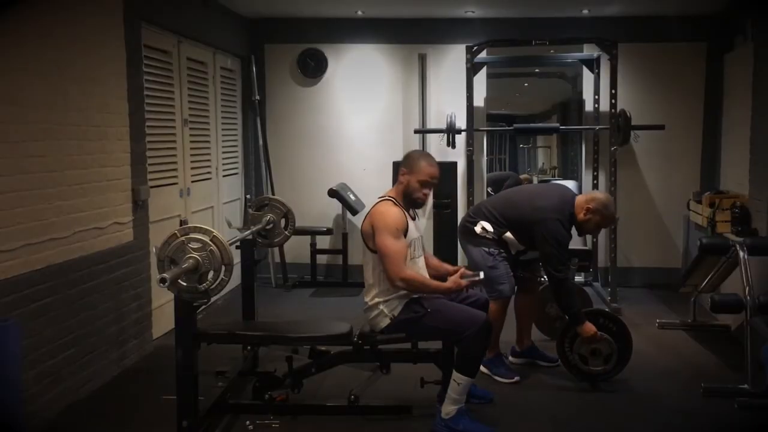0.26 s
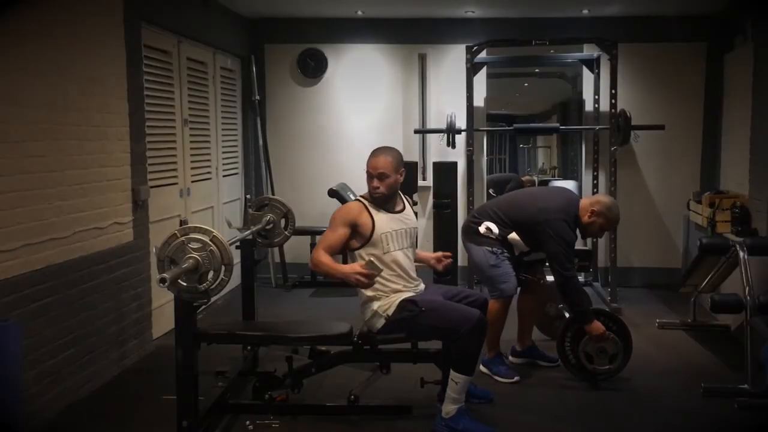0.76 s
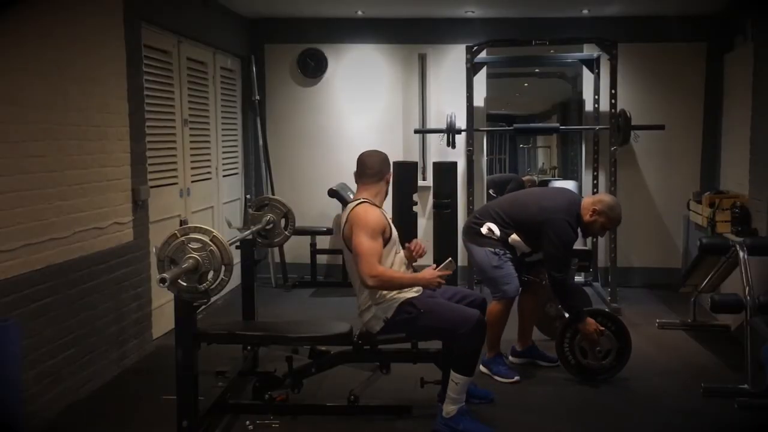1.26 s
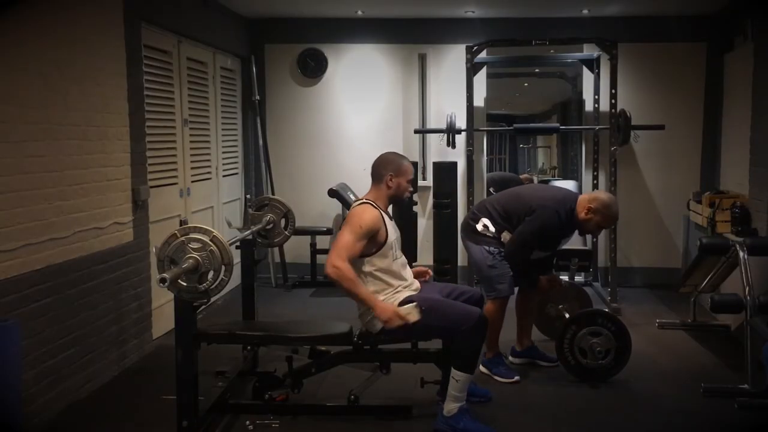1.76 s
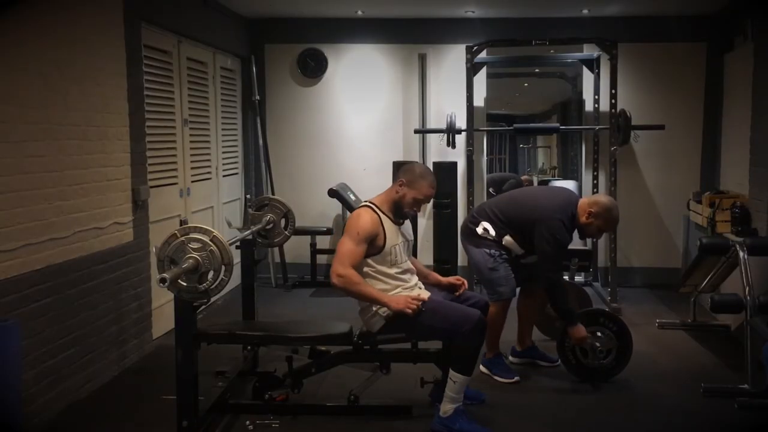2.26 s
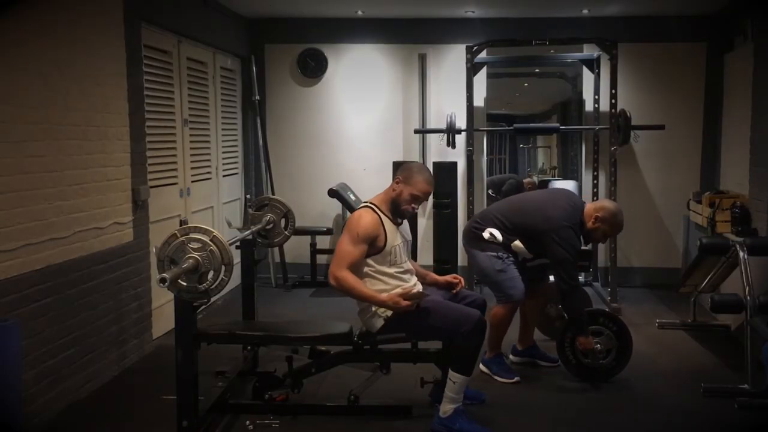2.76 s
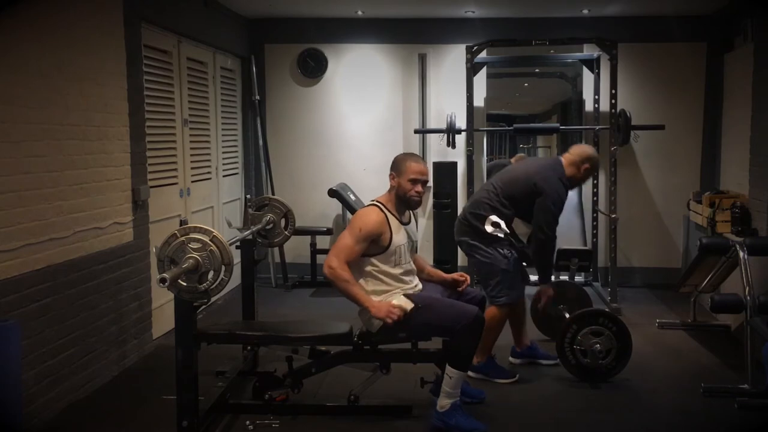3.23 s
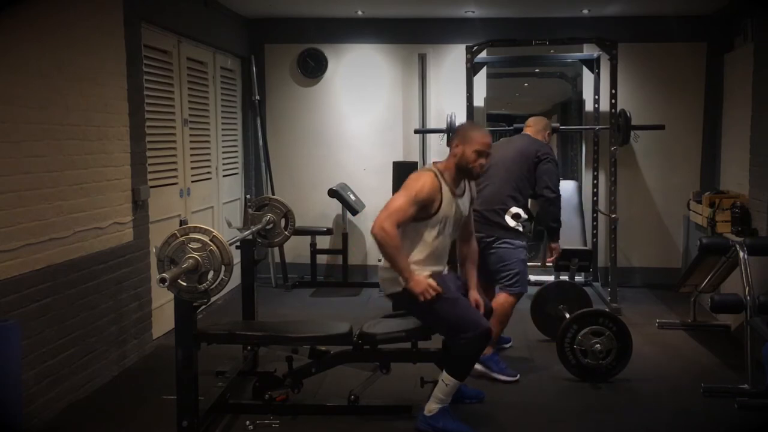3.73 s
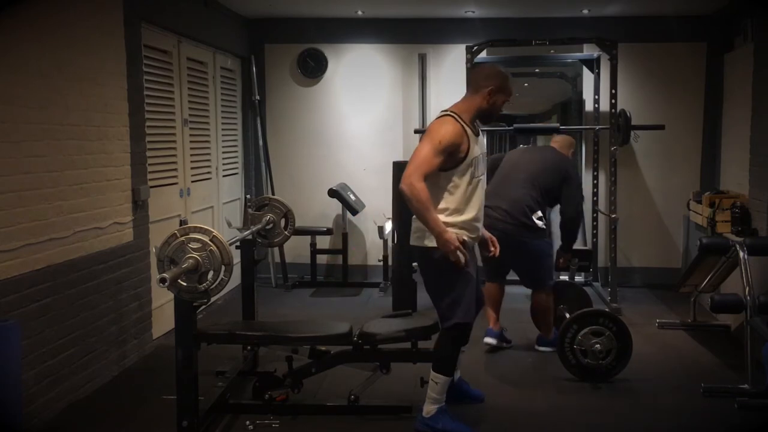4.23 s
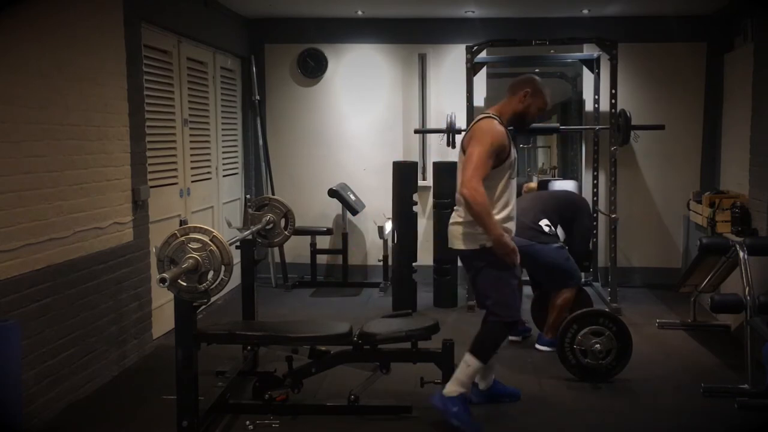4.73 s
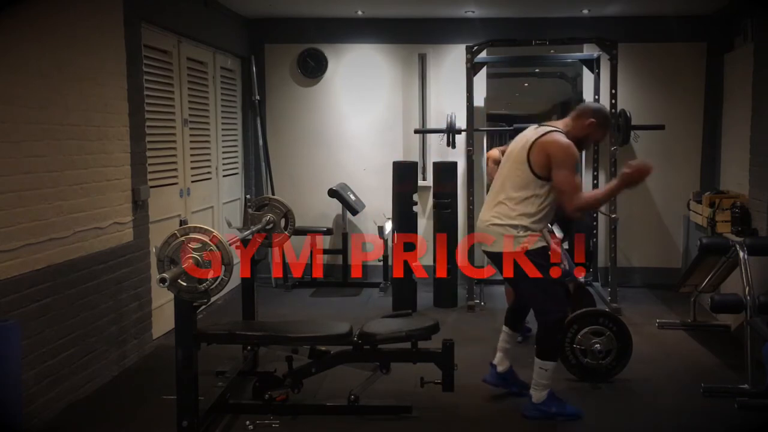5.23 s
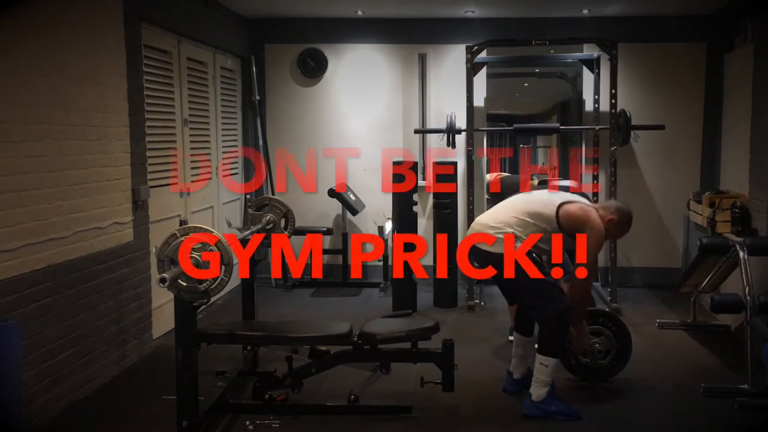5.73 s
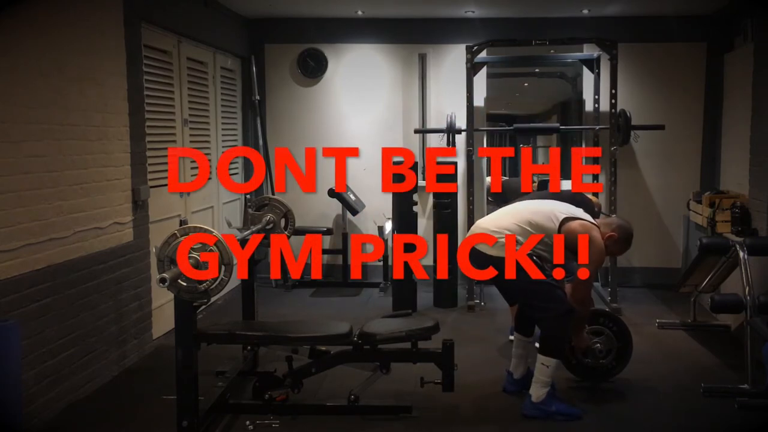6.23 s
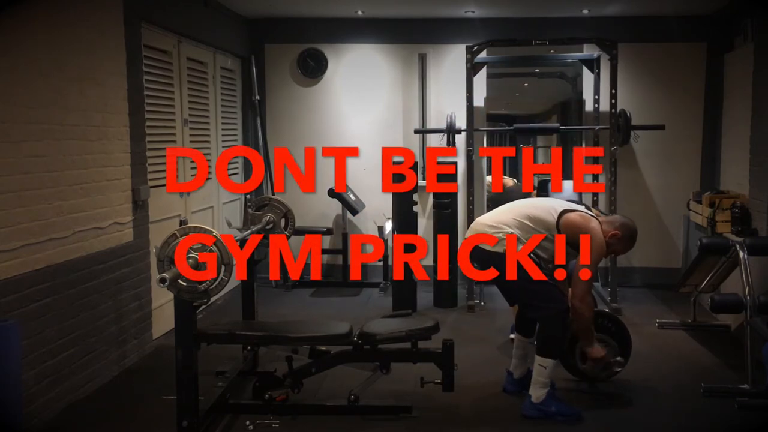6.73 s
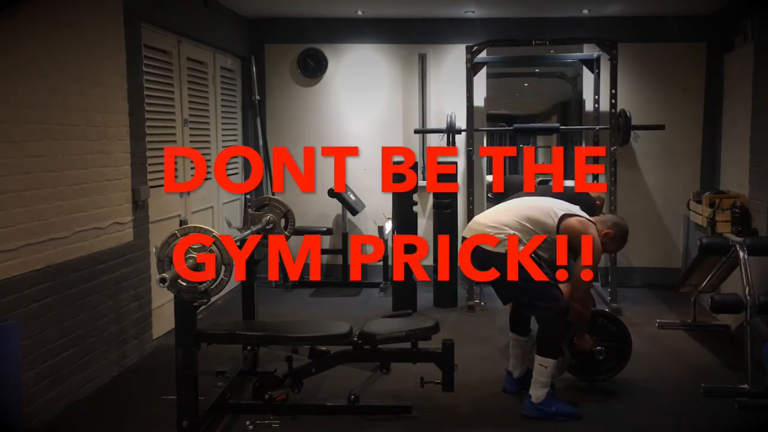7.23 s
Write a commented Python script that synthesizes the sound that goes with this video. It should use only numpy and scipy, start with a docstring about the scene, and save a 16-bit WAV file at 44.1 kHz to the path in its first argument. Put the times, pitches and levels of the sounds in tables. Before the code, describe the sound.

Two loud metallic clanks come in the first second and a half, the second deeper and singing on. A few light collar clicks tick before three seconds, then a quiet stretch of low air noise and soft movement. Duller clinks, a scrape and a rubber-mat thud lead to a hard closing slam, all with the short, dense echoes of a hard-walled room, heard by a single microphone.

```python
"""A small hard-walled gym, where iron weight plates are knocked, slid along a bar and racked.
Each contact is a crack of shaped noise with dense echoes, plus the ringing modes of its piece of iron.
The large plates sing on as pairs of close tones that beat; feet and rims thud on the rubber mat.
Cloth brushes as faint grainy hiss, over ventilation noise, fan tones and a low, unsteady hum near 49 Hz."""
import sys
import numpy as np
from scipy import signal
from scipy.fft import rfft, irfft, next_fast_len
from scipy.io import wavfile
from scipy.ndimage import map_coordinates

SR = 44100
rng = np.random.default_rng(int(sys.argv[2]) if len(sys.argv) > 2 else 0)


def wav_record(signal):
    """Record a signal, one row per channel, as 16-bit PCM in the file named by sys.argv[1]."""
    frames = np.transpose(np.atleast_2d(signal))
    bounded = np.clip(frames, -1, 1)
    # unit amplitude maps onto the largest positive 16-bit level
    quanta = np.round(bounded * 32767).astype(np.int16)
    wavfile.write(sys.argv[1], SR, quanta)


def volts(x):
    """Linear amplitude factor 10**(x/20) for a level x in dB, scalar or array-like."""
    e = np.asarray(x, float) / 20
    return 10 ** e


N = 329868  # samples in the scene
LONG = 5 * SR // 4  # samples in one contact, tone or thud

# Contacts of the iron; levels are nominal, the ring is relative to the clatter:
# (time [s], peak above 2 kHz [dB], rise [s], ring [dB], favoured frequency [Hz])
LIFT_CONTACTS = [(0.3051, -17, 0.00398, -11, 4300), (0.68, -48, 0.013, -4.5, 11000)]  # a plate knocks the stack as it is lifted
BAR_CONTACTS = [(.861, -44.5, .012, -8, 1970), (.951, -28.5, 0.022, -17.5, 6600),
                (1.307, -35.5, 0.0074, -17, 3900), (1.34, -27, 0.039, -16, 1970)]  # the plate grazes the bar
DROP_CONTACTS = [(1.3815, -15, .001, -2.5, 1125), (1.4062, -21, 0.001986, -6.5, 9800)]  # the heavy plate lands on the others
COLLAR_CONTACTS = [(2.4897, -32, 0.0007, -13, 2300), (2.6329, -30, 0.00088, -15, 9100),
                   (2.7544, -38.5, 0.0009, -23, 12300), (2.81, -33.5, 0.0013, -16, 6900),
                   (2.9502, -45, 0.0009, -15.5, 3320), (7.1636, -35, 0.00057, -14.5, 7870)]  # a steel collar clicks
NUDGE_CONTACTS = [(5.05, -47, 0.09, -26, 5500), (5.15, -39, 0.022, -12.5, 1490),
                  (5.178, -25.5, 0.0044, -17.5, 3760), (5.488, -50.5, .008, -7, 8200),
                  (5.663, -56.5, 0.013, -6.5, 5500)]  # a plate is nudged loose
SLIDE_CONTACTS = [(5.79, -28.5, .08, -18.5, 3170), (5.855, -26, .07, -14, 6400)]  # it slides along the sleeve
TILT_CONTACTS = [(6.41, -35.5, .08, -16.5, 7100), (6.458, -29.5, .017, -23, 4340),
                 (6.55, -33, .04, -15, 2650), (6.68, -29, 0.025, -10.5, 3060)]  # it tips against its neighbour
RACK_CONTACTS = [(7.2426, -15, .005, -11, 700), (7.2501, -14, .005, -17.5, 5700)]  # it is slammed home

# Ringing modes of each piece of iron, with nominal strength and decay:
# (frequency [Hz], level [dB], t60 [s])
LIFT_RING = [(700, -8.5, 0.69), (821, -12, 0.64), (1043, -11, .45), (1375, -1.5, 0.8), (1950, -6, 0.25),
             (2240, -20, 1), (2577, -8.5, 0.92), (3050, -4, 0.63), (4300, -29, 0.37), (5700, -8, 0.59),
             (6370, -12, 0.58)]
BAR_RING = [(755, -3, 0.72), (1340, -0.5, 0.82), (1523, -0.5, 0.93), (1970, -12.5, 1.3), (2450, -7.5, 1.5),
            (3450, -6, 1), (3410, -28, .45), (4330, -14, .5), (6050, -14.5, 0.82)]
DROP_RING = [(746, -17, 0.75), (803, -7.5, 1.19), (867, -7.5, 0.86), (1075, -31, 1.34), (1507, -4.5, 0.68),
             (1605, -18, .5), (1965, -23.5, 1.3), (2460, -24, 1.2), (2830, -12, 0.97), (3500, -21.5, 1),
             (4050, -17.5, 1.1), (4587, -28, .4), (5500, -28, .4), (6400, -27, 0.68)]
COLLAR_RING = [(2300, -15, 0.4), (2850, -18, 0.82), (3260, -13, 0.97), (3710, -5, 0.45), (4530, -5, 0.35),
               (6100, -22.5, 0.36), (6550, -8.5, 0.45), (7100, -26, .3), (8330, -4, 0.43),
               (9300, -12, 0.23), (9900, -11, 0.13), (12300, -7, 0.12)]
NUDGE_RING = [(700, -6.5, 1), (1049, -8, 0.74), (1304, -5.5, 1), (1515, -5.5, 1), (2573, -8.5, 0.55),
              (3604, -8.5, 0.55), (4830, -5, 0.47), (5140, -15, 0.54), (5750, -8, 0.2), (6616, -16, 0.37),
              (8200, -12, 0.19)]
SLIDE_RING = [(2530, -10.5, 0.69), (3390, -4, 0.68), (5230, -6, 0.68), (5480, -2.5, 0.46),
              (5790, -23, 0.17), (6120, -25, 0.74), (7063, -23, 0.26), (8000, -6, 0.48), (8730, -4, 0.54),
              (9668, -16, 0.48)]
TILT_RING = [(1344, -5.5, 0.86), (1530, -7, 0.93), (1970, -12, 1), (2240, -14, 1), (3060, -10.5, 0.54),
             (4200, -10, 0.69), (5600, -30, .6), (6400, -9.5, 0.23), (9700, -16, 0.41)]
RACK_RING = [(1418, -4.5, 0.68), (2090, -13.5, .5), (2280, -15, 0.94), (3150, -6, 1), (3360, -12, 0.87),
             (3600, -12, 0.7), (4340, -5, 0.53), (5320, -1, 0.36), (5720, -10, 0.5), (5820, -8.5, 0.76),
             (6300, -8, 1), (7440, -10.5, .6)]

# Colour of each clatter, a relative spectrum: (frequency [Hz], density [dB per Hz])
LIFT_CLATTER = [(100, -17.5), (350, -7), (900, -2), (2000, -10.5), (5800, -13), (9000, -18.5),
                (16000, -36.5)]
BAR_CLATTER = [(200, -10), (900, -1), (1500, -7), (2200, -16.5), (3600, -5.5), (6400, -13.5), (9000, -22),
               (16000, -48)]
DROP_CLATTER = [(60, -18), (300, -11.5), (900, -13.5), (1500, -9.5), (2200, -23.5), (4000, -17),
                (6500, -21), (9000, -31), (16000, -49)]
COLLAR_CLATTER = [(500, -7), (1300, -0.5), (3000, -6), (6400, 2), (8300, -6), (12500, -9), (16000, -13)]
NUDGE_CLATTER = [(300, -48), (750, 2), (1400, -1), (2500, -6.5), (6300, -1), (9000, -13), (16000, -26)]
SLIDE_CLATTER = [(400, -31), (1200, 0), (2500, -12), (3500, -5), (6400, -5), (9000, -11.5), (16000, -23)]
TILT_CLATTER = [(300, -13), (900, -4), (1400, -10.5), (2500, -18.5), (4300, -11.5), (7000, -17),
                (10000, -19.5), (16000, -27)]
RACK_CLATTER = [(60, -25), (300, -18.5), (1000, -19.5), (2000, -26), (3200, -18), (5800, -27), (9000, -30),
                (16000, -45)]

# The pieces of iron: (contacts, modes, colour, decay factor [ratio])
IRON = [(LIFT_CONTACTS, LIFT_RING, LIFT_CLATTER, 1.105),
        (BAR_CONTACTS, BAR_RING, BAR_CLATTER, 1.18),
        (DROP_CONTACTS, DROP_RING, DROP_CLATTER, 1.077),
        (COLLAR_CONTACTS, COLLAR_RING, COLLAR_CLATTER, 1.19),
        (NUDGE_CONTACTS, NUDGE_RING, NUDGE_CLATTER, 1.23),
        (SLIDE_CONTACTS, SLIDE_RING, SLIDE_CLATTER, 1.065),
        (TILT_CONTACTS, TILT_RING, TILT_CLATTER, 1.12),
        (RACK_CONTACTS, RACK_RING, RACK_CLATTER, 1.02)]

# Decay of the room's echoes, before the decay factor: (frequency [Hz], t60 [s])
ROOM_DECAY = [(100, 0.84), (500, 0.46), (2000, 0.83), (6000, .5), (12000, 0.34), (16000, .25)]
# Long tones of the large plates, each a pair of close modes around one frequency:
# (time [s], frequency [Hz], rise [s], beat rate [Hz], first dip after the blow [s])
SINGING_TONES = [(.304, 1525, .002, 4.5, .24), (.858, 1968, .01, 3, .3), (1.382, 829, .002, 2.4, .17),
                 (1.382, 1518, .002, 11, .05), (1.4, 1287, .002, 2.7, .22), (1.403, 2870, .002, 6, .12),
                 (2.81, 1291, .04, 4.2, .26), (5.49, 1357, .03, 6, .1), (5.86, 1288, .04, 4.5, .23),
                 (6.678, 4210, .01, 3, .3), (7.247, 817, .008, 5.2, .18), (7.247, 1526, .006, 5.2, .19)]
# How each of these tones dies away, in the same order: (level [dB], t60 [s])
SINGING_DECAYS = [(-27.5, 1.24), (-48.5, 1.26), (-16, 0.89), (-29.5, 1.3), (-33, 1.3), (-26.5, 0.87),
                  (-43.5, 0.71), (-42.5, 0.56), (-40, 0.75), (-38, 0.26), (-18.5, 1.04), (-18.5, 0.7)]
# Feet and rims on the rubber mat: (time [s], nominal peak [dB], centre frequency [Hz], t60 [s])
MAT_THUDS = [(0.62, -44.5, 336, 1), (2.002, -46.5, 305, 0.9), (3.534, -47, 250, 0.99),
             (4.599, -43, 316, 0.58), (5.15, -48, 358, 1), (5.439, -49, 342, 0.8), (5.75, -48.5, 213, 0.25),
             (6.449, -52, 480, 0.69), (6.473, -26, 500, 0.69), (6.719, -38.5, 346, 0.66),
             (7.254, -33.5, 297, 0.27)]
# Brushes of clothes: (time [s], level [dB])
CLOTH_BRUSHES = [(3.35, -69), (3.8, -68.5), (4.37, -74)]
# Relative spectrum of the ventilation noise: (frequency [Hz], density [dB per Hz])
AIR_COLOUR = [(18, -31), (30, -9.5), (106, -8.5), (138, -1), (165, -7.5), (245, -7), (336, -6.5),
              (404, -8.5), (437, -8), (666, -9), (721, -5.5), (16000, -44.5)]
# Fan tones: (frequency [Hz], level [dB rms], wander [Hz])
FAN_TONES = [(135, -68.5, 3), (155, -77, 0.94), (391, -70, 3)]
# Level of a low, unsteady hum near 49 Hz: (time [s], level [dB rms])
LOW_HUM_LEVEL = [(0, -71), (1.35, -68.5), (1.9, -80), (2.8, -71.5), (3.4, -77), (3.75, -68), (4.35, -73.5),
                 (5.5, -74), (6.1, -61), (6.5, -72), (7.48, -63.5)]
# Response of the microphone in its housing: (frequency [Hz], gain [dB])
MICROPHONE_RESPONSE = [(20, -19), (45, 3.5), (4300, .5), (5000, -4), (5600, 2), (9800, 1), (10600, -0.5),
                       (11500, 3.5)]


def plates():
    """Every contact clatters and rings its piece of iron; its build-up is centred on the listed time."""
    track = np.zeros(N)
    for contacts, modes, colour, slow in IRON:
        for s, db, rise, ring_db, favoured_hz in contacts:
            rise = max(rise, .0005)
            crack = clatter(colour, rise, favoured_hz, slow)
            add(track, s - rise / 2, volts(db - 11.5) * crack)
            ring = ringing(modes, rise, favoured_hz, slow)
            add(track, s - rise / 2, volts(db + ring_db) * ring)
    return track


def clatter(colour, rise, favoured_hz, slow):
    """The crack of the contact and its dense echoes: noise whose spectrum has rms 1 above 2 kHz."""
    def gain(hz):
        # many small unlisted modes roughen the spectrum
        fine_db = 3.6 * wobble(SR / 45, size=len(hz))
        broad_db = 1.5 * wobble(SR / 500, size=len(hz))
        level_db = along(colour, hz) + 6.0 * favour(hz, favoured_hz) + fine_db + broad_db
        g = volts(level_db) / (1 + (110 / (hz + 1)) ** 3)  # low cut
        return g / np.sqrt(np.mean(g ** 2 * (hz > 2000)))

    def t60(hz):
        return slow * along(ROOM_DECAY, hz)

    touching = np.arange(LONG) < 2 * rise * SR
    chatter_db = 1.6 * wobble(150, LONG) * touching  # rough surfaces skip while they touch
    return volts(chatter_db) * fading_noise(gain, t60, rise)


def ringing(modes, rise, favoured_hz, slow):
    """Modes at new strengths each blow; echoes and chatter blur each one, the high ones most."""
    t = np.arange(LONG) / SR
    ring = np.zeros(LONG)
    for hz, db, t60 in modes:
        t60 = min(slow, 1.15) * np.clip(t60, .2, 1.1 * (2000 / hz) ** .5)  # high modes are capped shorter
        blur_rate = 12 + .033 * hz  # knots per second
        blur = 0.11 + wobble(blur_rate, LONG) + 1j * wobble(blur_rate, LONG)
        strength_db = db + 8 * favour(hz, favoured_hz) + rng.normal(0, 1.5)
        level_db = strength_db - 60 * np.maximum(t - rise, 0) / t60
        ring += volts(level_db) * np.imag(blur * np.exp(2j * np.pi * hz * t))
    return ring * swell(rise + 0.0025)


def singing():
    """Nearly pure twin modes that almost cancel once a beat, with a slight flutter from the room."""
    twin_share, twin_grows_s = .9, .06  # second mode against the first; it takes up energy after the blow
    track = np.zeros(N)
    t = np.arange(LONG) / SR
    for (s, hz, rise, beat_hz, dip), (db, t60) in zip(SINGING_TONES, SINGING_DECAYS):
        twin_level = twin_share * (1 - np.exp(-t / twin_grows_s))
        twin = twin_level * np.exp(2j * np.pi * beat_hz * (t - dip))
        carrier = np.exp(2j * np.pi * (hz - beat_hz / 2) * t + 0.63j * wobble(30, LONG))
        level_db = db - 60 * t / t60 + 1.2 * wobble(40, LONG)
        onset = np.minimum(t / rise, 1)
        add(track, s, onset * volts(level_db) * np.imag((1 - twin) * carrier))
    return track


def thuds():
    """Soft contacts: a broad low resonance of the floor, no ring."""
    rise = 0.015  # s
    track = np.zeros(N)
    for s, db, centre_hz, t60 in MAT_THUDS:
        def gain(hz):
            octaves = np.log2((hz + 20) / centre_hz)
            return np.sqrt(SR / 2 / centre_hz) / (1 + (1.24 * octaves) ** 4 + (130 / (hz + 1)) ** 4)

        thud = fading_noise(gain, lambda hz: t60 + 0 * hz, rise)  # one t60 at all frequencies
        add(track, s - rise / 2, volts(db - 5) * thud)
    return track


def rustle():
    """Faint grainy hiss of cloth as people move: each brush swells and fades."""
    half_s = 0.099  # half the length of a brush
    t = np.arange(N) / SR
    strokes = sum(volts(db) * np.exp(-((t - s) / half_s) ** 2) for s, db in CLOTH_BRUSHES)
    grain = volts(3.3 * wobble(40, N))
    return strokes * grain * coloured([(1000, 2.0), (4000, 8.0), (16000, -16)])  # (Hz, dB)


def room_tone():
    """Ventilation noise that drifts a little, fan tones that waver in pitch and level, and a low hum."""
    t = np.arange(N) / SR
    air = volts(-59 + 0.28 * wobble(2.72, N)) * coloured(AIR_COLOUR)
    for hz, db, wander_hz in FAN_TONES:
        level = np.sqrt(2) * volts(db + 1.6 * wobble(1.2, N))  # a sine peaks at sqrt(2) times its rms
        air += level * wandering_sine(hz + wander_hz * wobble(11, N))
    low_hum = wandering_sine(49 + 8.3 * wobble(5.6, N)) * volts(2.0 * wobble(8, N))
    low_hum_level = np.sqrt(2) * volts(np.interp(t, *np.transpose(LOW_HUM_LEVEL)))
    return air + low_hum_level * low_hum


def wandering_sine(hz):
    """A sine that follows a moving frequency."""
    return np.sin(2 * np.pi * np.cumsum(hz) / SR)


def fading_noise(gain, t60, rise):
    """Coloured noise that swells; each frequency then dies at its t60, with a weaker, slower late tail."""
    spectrum = rfft(rng.standard_normal(LONG))
    noise = irfft(spectrum * gain(np.fft.rfftfreq(LONG, 1 / SR)), LONG)
    hz, t, z = signal.stft(noise, SR, nperseg=256)
    fall_db = -60 * np.maximum(t - rise, 0) / t60(hz)[:, None]
    fade = np.hypot(volts(fall_db), volts(-14 + 0.43 * fall_db))  # early decay and late tail
    return signal.istft(z * fade, SR, nperseg=256)[1][:LONG] * swell(rise)


def coloured(points):
    """Steady noise of rms 1 with a spectrum in dB."""
    size = next_fast_len(N)
    gain = volts(along(points, np.fft.rfftfreq(size, 1 / SR)))
    noise = irfft(rfft(rng.standard_normal(size)) * gain, size)[:N]
    return noise / np.std(noise)


def favour(hz, favoured_hz):
    """The spot that is struck favours the frequencies around its own: 1 there, 0 far away."""
    return np.exp(-(np.log2((hz + 1) / favoured_hz) / .2) ** 2)


def swell(rise):
    """The contact builds up over rise seconds."""
    return np.minimum(np.arange(LONG) / SR / rise, 1) ** 1.5


def along(points, hz):
    """Reads (Hz, value) points on a log frequency axis."""
    f, v = np.transpose(points)
    return np.interp(np.log(hz + 1), np.log(f + 1), v)


def wobble(rate, size):
    """A smooth random curve, rate knots per SR points (a second of sound)."""
    knots = rng.standard_normal(int(size * rate / SR) + 4)
    return map_coordinates(knots, [np.arange(size) * rate / SR])


def add(track, s, sound):
    """Mixes a sound in from second s."""
    part = track[round(s * SR):][:len(sound)]
    part += sound[:len(part)]


def scene():
    """All sources at one microphone."""
    return (plates() + singing() + thuds() + rustle() + room_tone())[None]


def top_cut(x):
    """Nothing passes above the cut-off."""
    return signal.sosfilt(signal.butter(12, 16540, fs=SR, output="sos"), x)


def record(dry):
    """The housing colours the sound; the loudest peaks are squeezed under a ceiling."""
    size = next_fast_len(N + SR // 4)
    response = volts(along(MICROPHONE_RESPONSE, np.fft.rfftfreq(size, 1 / SR)))
    x = irfft(rfft(dry, size) * response, size)[:, :N]
    ceiling = .53  # of full scale
    squeezed = x / (1 + np.abs(x / ceiling) ** 5) ** (1 / 5)
    return top_cut(squeezed)


dry = scene()
out = record(dry)
wav_record(out)
```